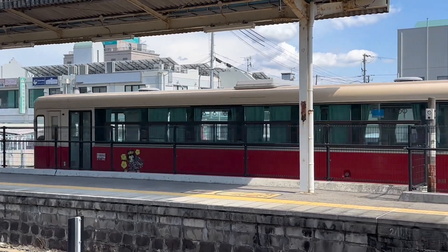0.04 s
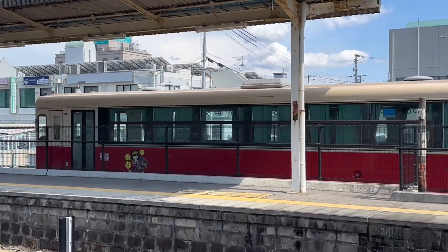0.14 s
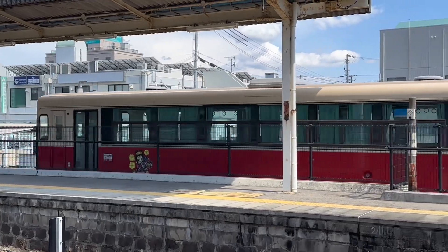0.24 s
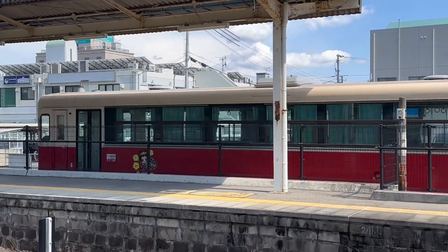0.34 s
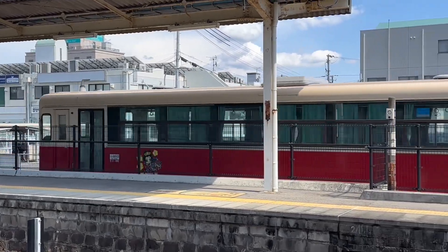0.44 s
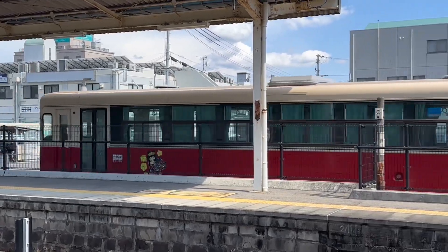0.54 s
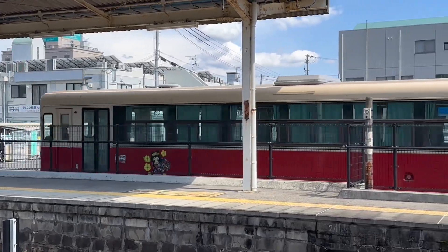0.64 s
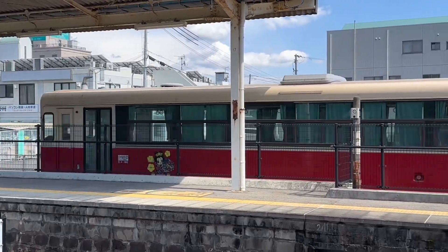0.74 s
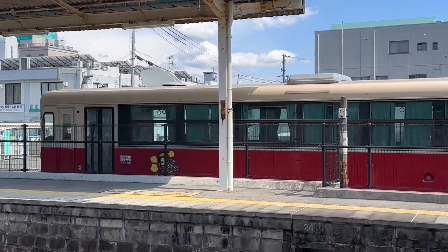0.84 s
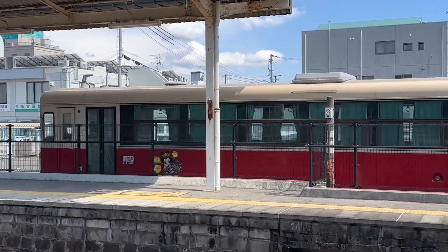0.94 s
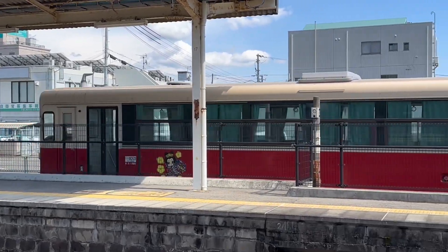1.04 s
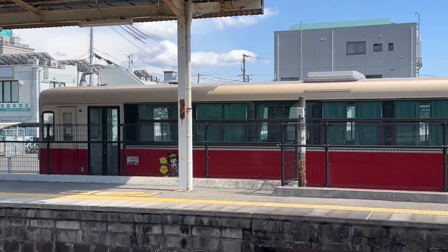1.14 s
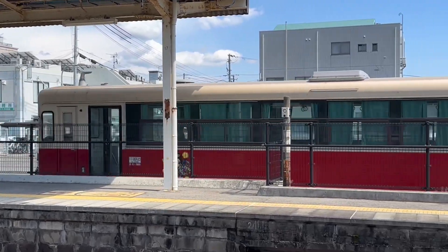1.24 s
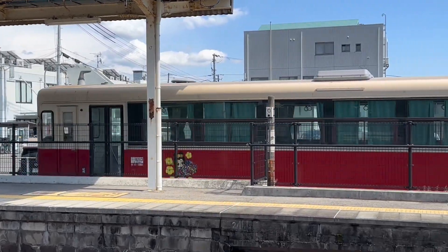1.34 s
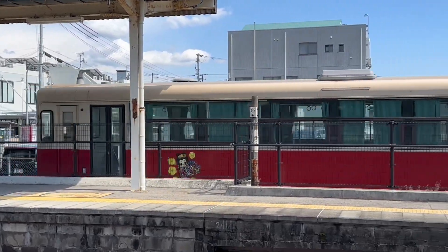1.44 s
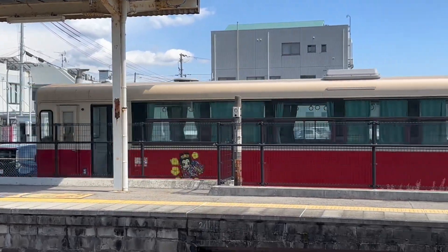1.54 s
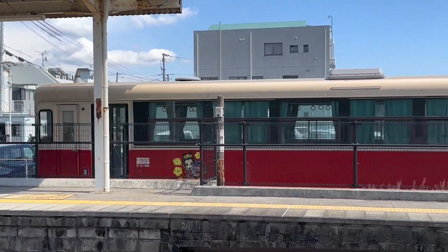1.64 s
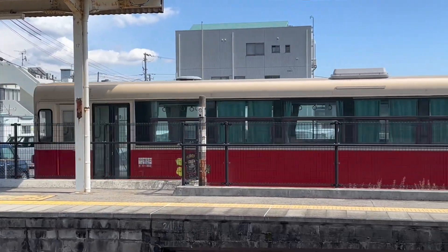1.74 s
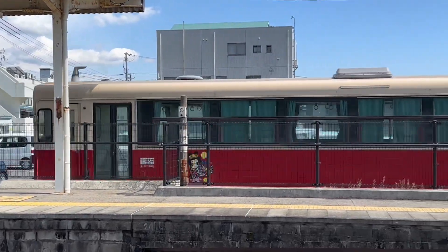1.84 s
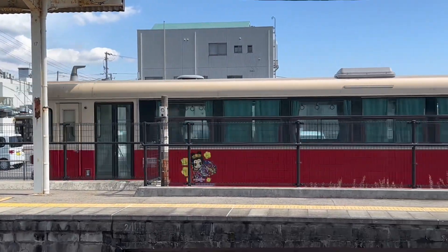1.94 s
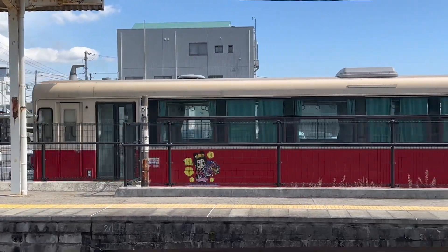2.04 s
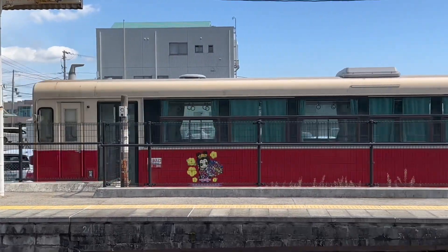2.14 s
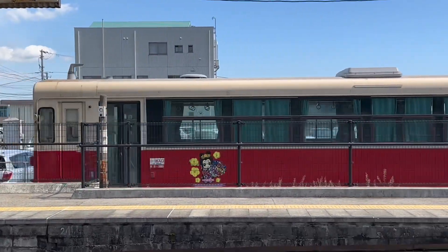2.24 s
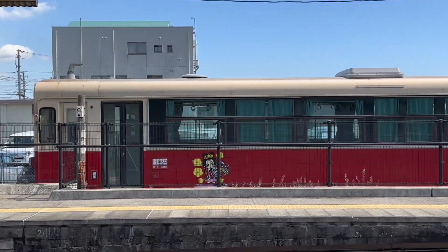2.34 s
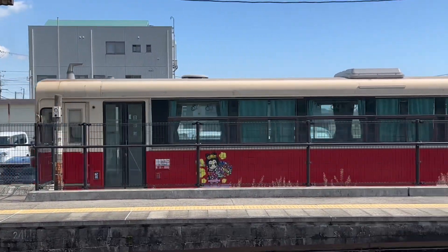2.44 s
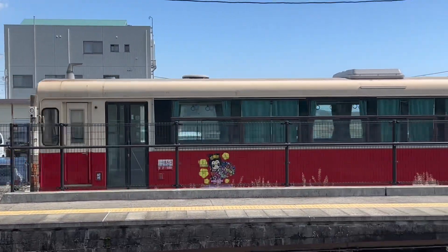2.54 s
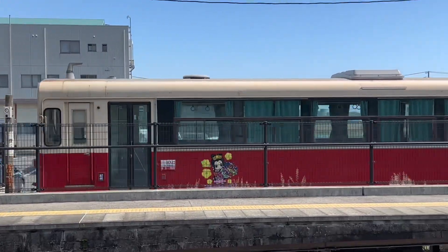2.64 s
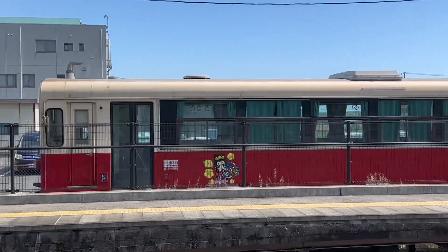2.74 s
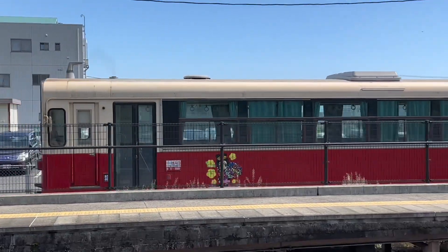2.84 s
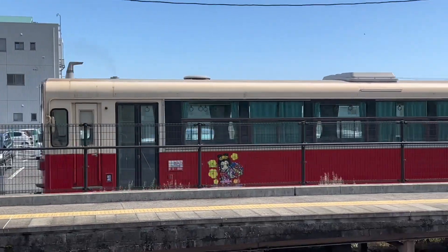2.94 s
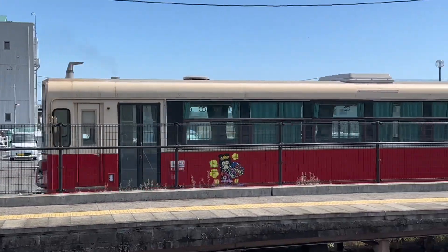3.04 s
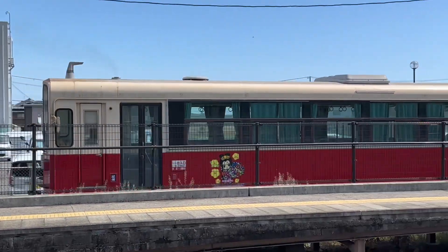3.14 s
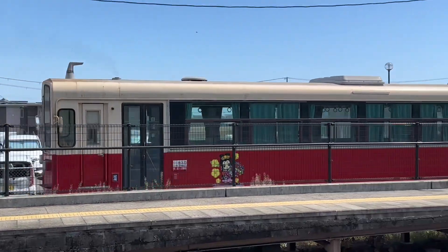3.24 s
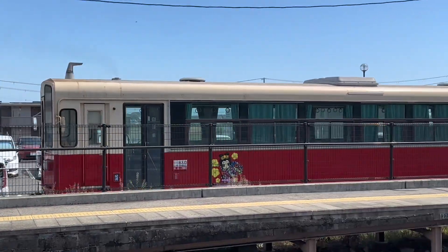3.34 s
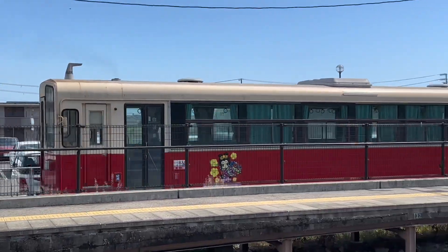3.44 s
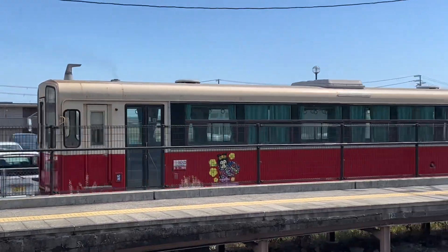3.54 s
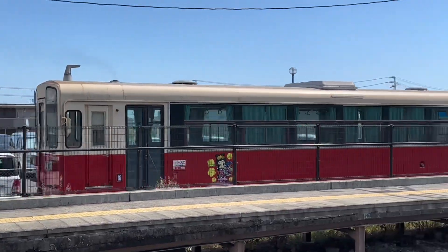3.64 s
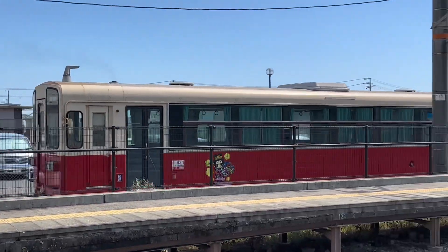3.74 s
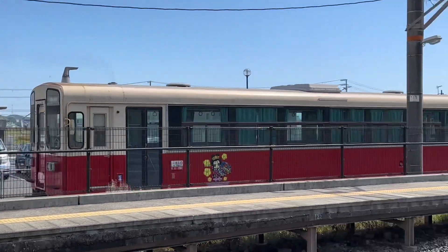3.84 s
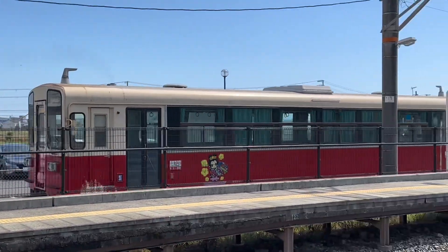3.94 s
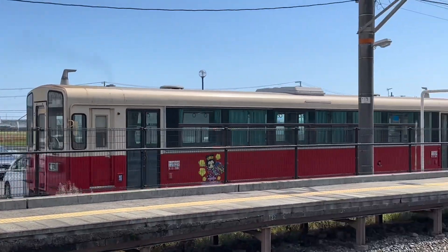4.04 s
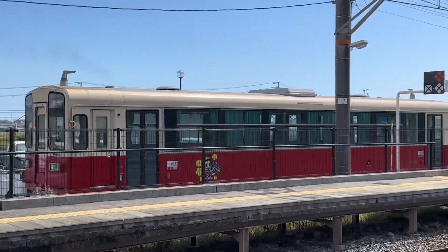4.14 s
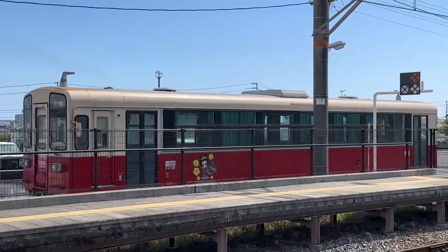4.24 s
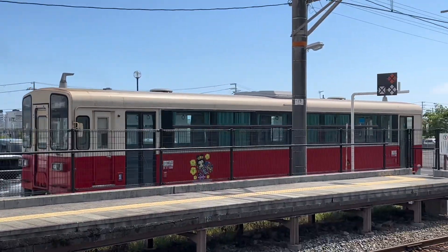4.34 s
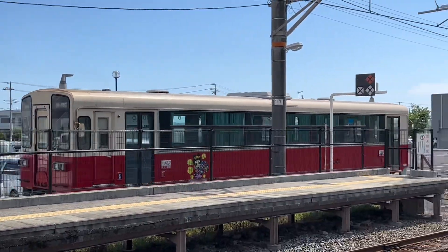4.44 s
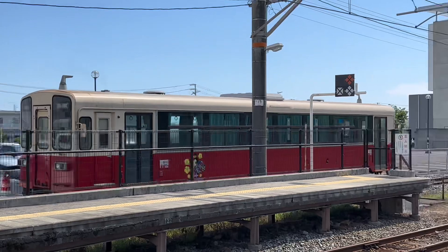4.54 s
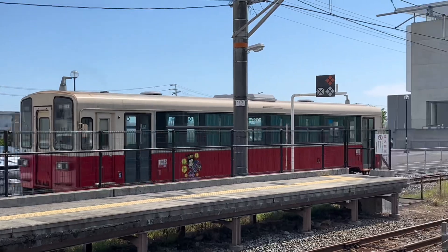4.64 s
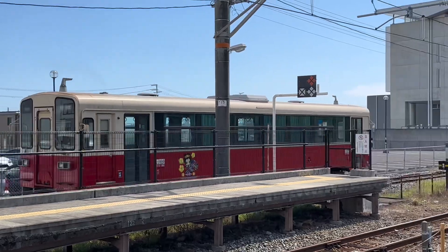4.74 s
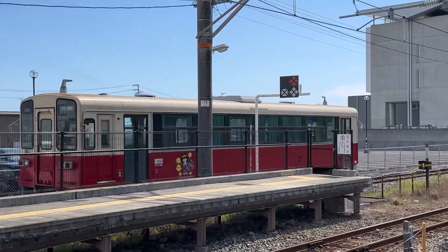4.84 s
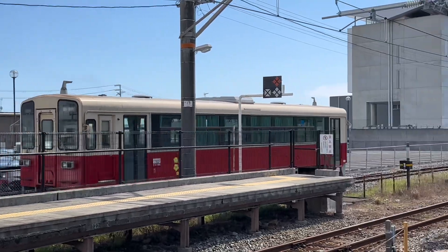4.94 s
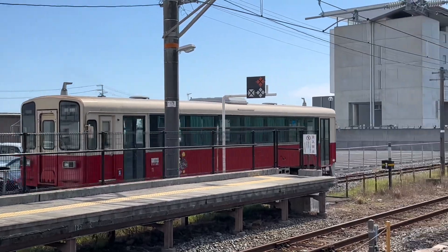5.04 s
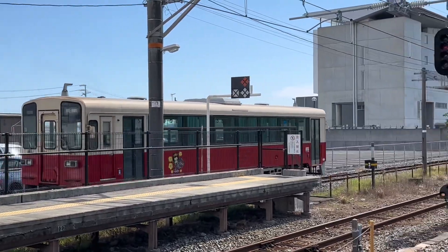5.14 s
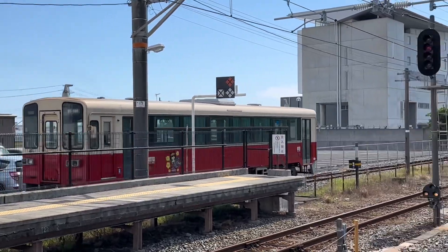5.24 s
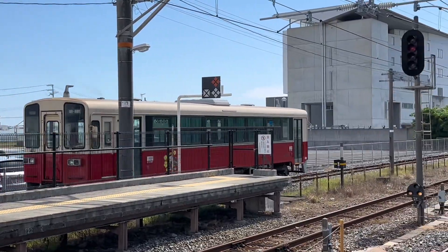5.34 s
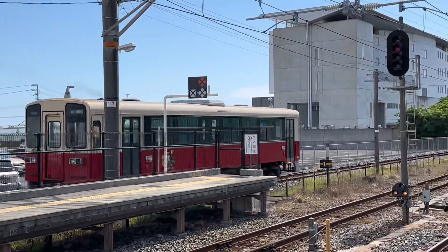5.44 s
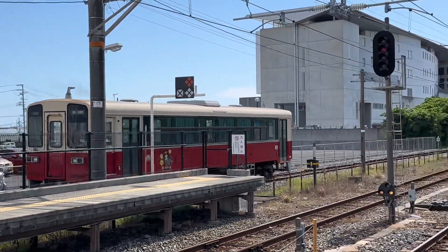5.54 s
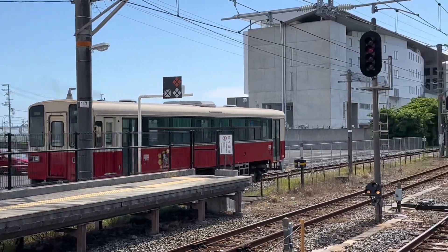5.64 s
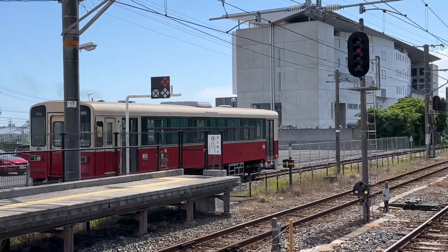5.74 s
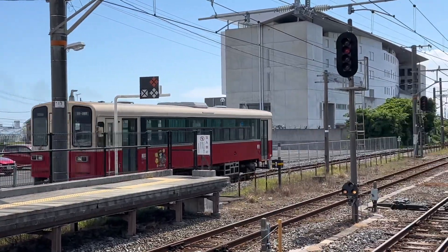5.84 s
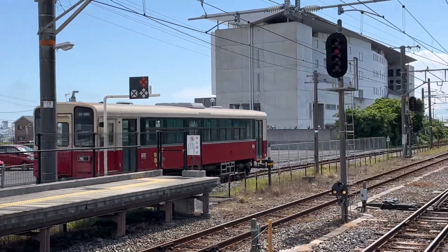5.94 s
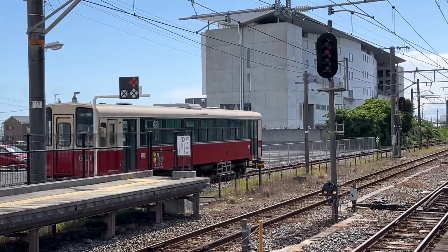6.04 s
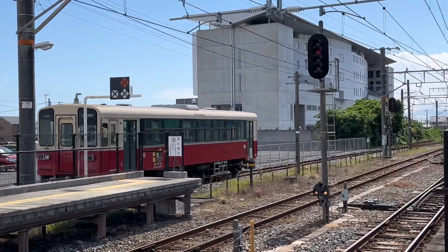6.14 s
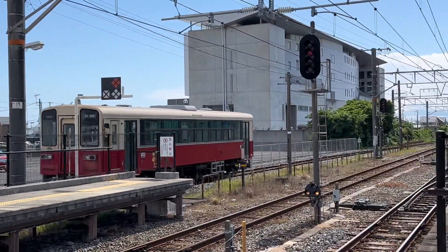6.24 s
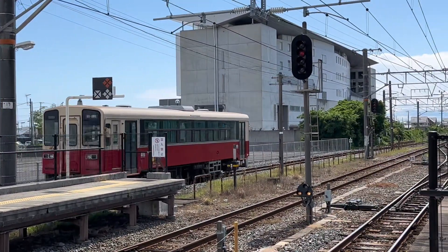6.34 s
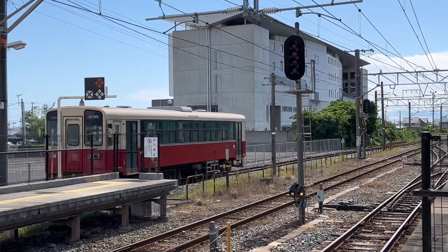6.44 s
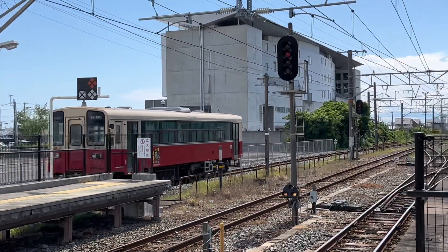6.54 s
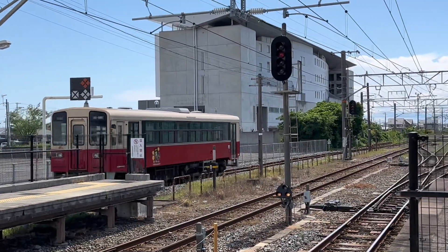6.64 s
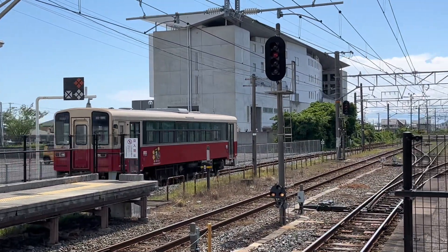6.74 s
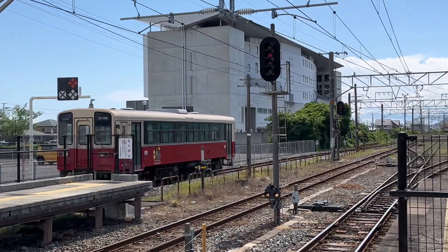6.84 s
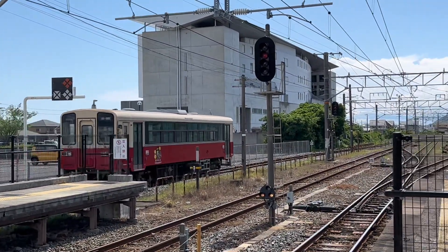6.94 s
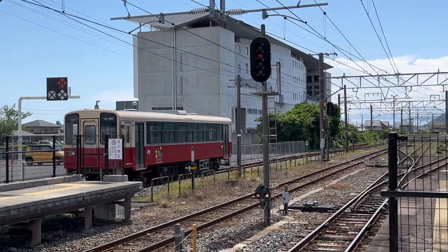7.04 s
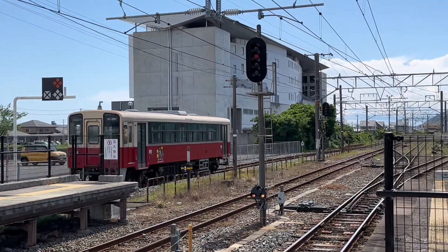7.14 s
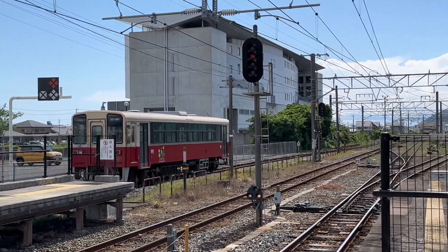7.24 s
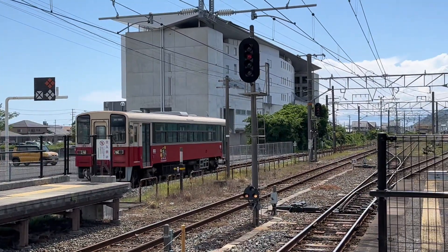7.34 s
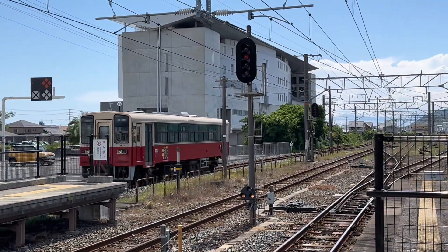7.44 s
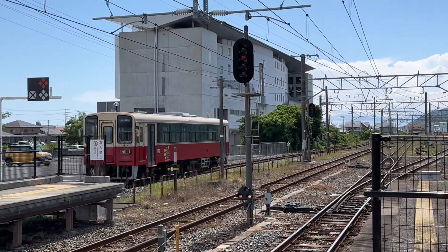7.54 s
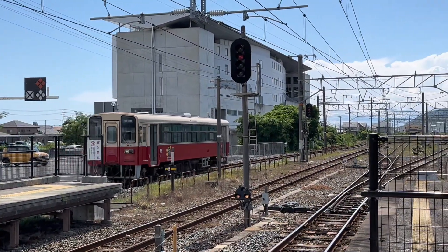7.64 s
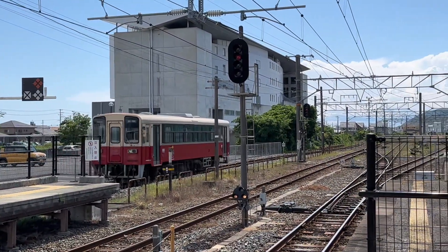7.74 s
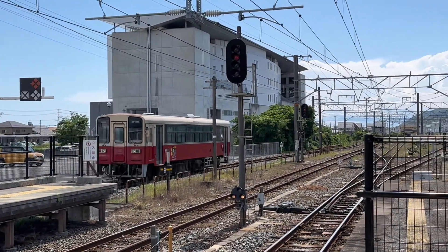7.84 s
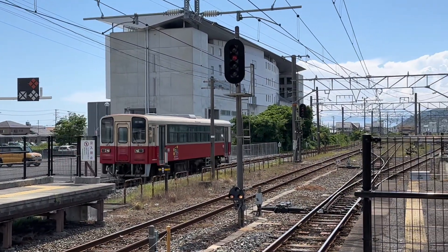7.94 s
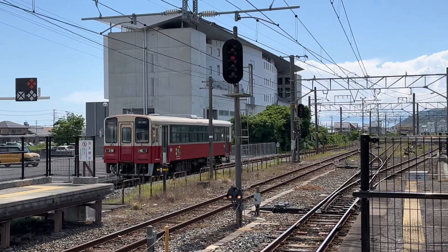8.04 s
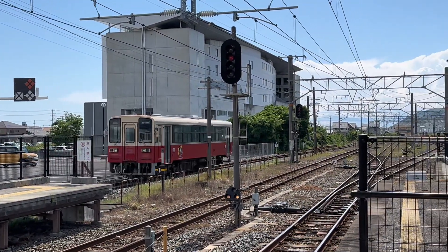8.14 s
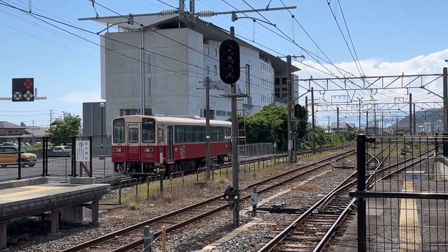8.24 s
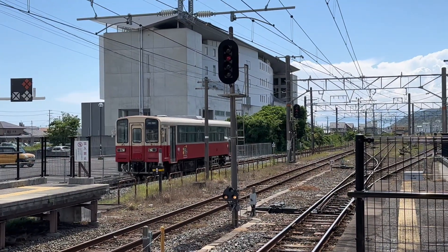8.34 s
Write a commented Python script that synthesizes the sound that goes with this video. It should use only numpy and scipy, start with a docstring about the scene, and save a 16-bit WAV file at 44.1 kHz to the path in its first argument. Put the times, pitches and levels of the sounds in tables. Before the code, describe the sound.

A diesel railcar pulls out past an outdoor station platform. Its engine throbs and clatters, then revs up with a drone and a thin drive whine. The wheels roar and hiss on the rails, clack over joints in pairs and squeal faintly as the car passes close. It then recedes, with a few hollow knocks and softer clicks. Gusty wind rumbles, flutters and thumps on the microphone throughout.

```python
"""A diesel railcar pulls out past a station platform and recedes in a gusty breeze.
Its firings throb in the exhaust and clatter in the casing while the drive train whines. Rough treads
roar on the rails, wheels strike the joints axle by axle and flanges squeal; a few hollow knocks sound
as the car turns away. Wind rumbles, flutters and thumps on the microphone's two ports throughout."""
import sys
import numpy as np
from scipy import signal
from scipy.fft import rfft, irfft
from scipy.io import wavfile
from scipy.ndimage import uniform_filter1d, map_coordinates

SR = 44100
rng = np.random.default_rng(int(sys.argv[2]) if len(sys.argv) > 2 else 0)


def to_wav(s):
    """Save 16-bit WAV."""
    ch = np.atleast_2d(s).T  # columns
    pcm = np.round(np.clip(ch, -1, 1) * 32767)  # PCM
    wavfile.write(sys.argv[1], SR, pcm.astype(np.int16))


N = 369999
TIME = np.arange(N) / SR
FREQS = np.fft.rfftfreq(N, 1 / SR)

# The car draws level at ABREAST_S, TRACK_M away and doing SPEED_M_S, and keeps gathering speed.
ABREAST_S, TRACK_M, SPEED_M_S, ACCEL_M_S2 = 2.58, 12.73, 4.66, 0.58
# The throttle opens; later the car turns its tail to the platform and its body hides the underfloor.
THROTTLE_S, TURN_S, TURN_TAKES_S = 1.46, 5.395, 0.7


def undb(db):
    """Decibels to gain."""
    return 10 ** (np.asarray(db) / 20)


def unit(x):
    """Scale to rms 1."""
    return x / np.sqrt(np.mean(x ** 2))


def curve(points, at=TIME):
    """Join breakpoints with straight lines."""
    return np.interp(at, *np.transpose(points))


def ramp(middle_s, takes_s):
    """A smooth fade from 0 to 1."""
    return .5 + .5 * np.tanh((TIME - middle_s) / takes_s)


def noise(side_db):
    """Stereo white noise: a shared part and a weaker opposed one."""
    mid, side = rng.standard_normal((2, N))
    return unit(mid + undb(side_db) * side * np.array([[1], [-1]]))


def walk(rate, size=N):
    """Smooth random drift of rms 1, about rate turns a second."""
    hold = max(int(SR / rate), 20)
    steps = np.repeat(rng.standard_normal(N // 20 + 1)[:size // hold + 1], hold)
    return unit(uniform_filter1d(uniform_filter1d(steps, hold), hold)[:size])


def colour(x, spectrum):
    """EQ by a (Hz, dB) curve that rolls off beyond its ends; rms 1."""
    hz, db = np.transpose(spectrum)
    gain = undb(np.interp(np.log(FREQS + 1), np.log(hz), db))
    roll_off = np.hypot(1, (hz[0] / 2 / (FREQS + 1)) ** 2) * np.hypot(1, (FREQS / hz[-1] / 2) ** 2)
    return unit(irfft(rfft(x) * gain / roll_off, N))


def resonate(x, modes):
    """Ring (Hz, width, dB) resonances with x; rms 1."""
    body = sum(undb(db) / (1 + 2j * (FREQS - hz) / width) * FREQS / (FREQS + hz)
               for hz, width, db in modes)
    return unit(irfft(rfft(x) * body, N))


def tones(table, peak_at=0.48):
    """Wavering tones that glide, swelling until the share peak_at of their length and then fading."""
    out = np.zeros(N)
    for start, length, start_hz, end_hz, width_hz, db in table:
        near = (TIME >= start) & (TIME < start + length)
        progress = (TIME[near] - start) / length
        phase = 2 * np.pi * np.cumsum(start_hz + (end_hz - start_hz) * progress) / SR
        tone = walk(width_hz, len(phase)) * np.cos(phase) + walk(width_hz, len(phase)) * np.sin(phase)
        swell = np.sin(np.pi * np.interp(progress, [0, peak_at, 1], [0, .5, 1]))
        out[near] += undb(db) * swell * tone
    return out


def distance_m():
    """How far away the car is as it draws level and runs on."""
    age = TIME - ABREAST_S
    return np.hypot(SPEED_M_S * age + .5 * ACCEL_M_S2 * age ** 2, TRACK_M)


def passing(db, idle_db, hidden_db, build_s, lag_s=0, hide_lag_s=0):
    """Fader ride in dB: follows distance, adds idle_db before the throttle, hidden_db after the turn."""
    distance_db = -20 * np.log10(distance_m() / TRACK_M)
    load = ramp(THROTTLE_S + lag_s, build_s)
    hidden = ramp(TURN_S + hide_lag_s, TURN_TAKES_S)
    return db + distance_db + idle_db * (1 - load) + hidden_db * hidden


# The revs climbing. Each row: time in seconds, firing rate in Hz.
FIRING_RATE = [(0, 63.2), (.6, 64.04), (1.2, 66.94), (1.6, 69.53), (2.0, 72.4), (2.3, 73.4), (2.55, 74.4),
               (2.75, 76.9), (3.1, 77.9), (3.6, 78.7), (4.6, 79.3), (8.39, 80)]
# The drone's harmonics. Each row: multiple of the firing rate, relative level in dB.
DRONE_ORDERS = [(7, -6), (10, 1), (10.5, -3), (11, -5), (11.5, -6), (12, 3), (13, 1), (13.5, -3), (14, -6),
                (15, -3), (16, -6), (21, -9), (22, -9)]
# The ring of casing and underfloor. Each row: pitch in Hz, width in Hz, relative level in dB.
CASING_MODES = [(767, 23, -8), (1052, 77, 3), (1480, 50, 0), (3180, 88, -15)]


def engine(knock_depth=0.52, overtone_db=-8, waver_db=3):
    """Each firing pushes the exhaust and knocks the casing; under load the high orders drone."""
    firings = np.cumsum(curve(FIRING_RATE) * (1 + .003 * walk(20))) / SR
    exhaust = sum(undb(overtone_db * k) * np.sin(2 * np.pi * (k + 1) * firings) for k in range(4))
    drone = np.zeros(N)
    for order, db in DRONE_ORDERS:
        swell = undb(db + waver_db * walk(9.4))  # moving air swells and fades each order on its own
        drone += swell * np.sin(2 * np.pi * (order * firings + rng.random()) + 0.27 * walk(12))
    pulse = 1 + knock_depth * np.cos(2 * np.pi * firings)
    clatter = resonate(noise(side_db=-47) * pulse * undb(0.62 * walk(70)), CASING_MODES)
    exhaust_db = passing(db=-38, idle_db=3.5, hidden_db=-18, build_s=0.27) + 6 * walk(9.7)
    clatter_db = passing(db=-37, idle_db=0, hidden_db=-52, build_s=0.33)
    drone_db = passing(db=-35.5, idle_db=-11, hidden_db=-31, build_s=0.12, lag_s=0.44)
    return unit(exhaust) * undb(exhaust_db) + clatter * undb(clatter_db) + unit(drone) * undb(drone_db)


# Thin midrange whines. Each row: start and length in seconds, start pitch, end pitch and width in Hz,
# level in dB.
DRIVE_WHINES = [(-0.2, 1, 810, 790, 22.5, -42), (0.1, 0.86, 1051, 1057, 7.7, -38.5),
                (0.1, 0.55, 1520, 1518, 38, -43), (0.6, 0.7, 1485, 1505, 24, -46),
                (0.8, 0.82, 1035, 1068, 20, -46), (1.2, 0.96, 960, 963, 20, -38),
                (1.45, 0.77, 1025, 1055, 7.1, -37), (1.7, 0.596, 1075, 1098, 7, -37.5),
                (1.3, 0.5, 1480, 1500, 9, -41.5), (1.95, 0.42, 1534, 1523, 8.3, -41),
                (2.0, 1.01, 871, 894, 6.8, -36.5), (2.35, 0.92, 1001, 1018, 18, -38),
                (2.5, 0.51, 916, 930, 6, -38), (2.55, 0.62, 764, 786, 9.7, -37),
                (2.5, 0.835, 1146, 1178, 8.2, -44), (3.15, 0.5, 1165, 1206, 7.6, -42.5),
                (3.25, 0.71, 934, 948, 7.6, -45), (3.35, 0.92, 1052, 1059, 7, -42),
                (3.55, 0.91, 1037, 1019, 12.3, -36.5), (2.65, 0.5, 1486, 1494, 10, -46),
                (3.25, 0.56, 1464, 1470, 10.2, -43.5), (3.9, 0.47, 1514, 1543, 12, -43.5)]


def drive_train():
    """The drive train whines in narrow, overlapping tones, most of them creeping upward."""
    return tones(DRIVE_WHINES)


def ridged(x, ripple_db, spacing_hz):
    """Fine random spectral ridges give noise a faint metallic ring, sinking as the car passes; rms 1."""
    ridges = np.interp(FREQS / spacing_hz, np.arange(2400), rng.standard_normal(2400))
    ringing = irfft(rfft(x) * undb(ripple_db * ridges), N)
    sent = (TIME - distance_m() / 343) * SR  # the changing travel time gives the Doppler bend
    return unit(np.array([map_coordinates(side, [sent], order=3, mode="mirror") for side in ringing]))


# The rolling bed's low, middle and top layers. Each row: frequency in Hz, relative level in dB.
ROAR_EQ = [(60, -22), (200, 1.5), (400, -1), (510, -2.5), (660, -6), (780, 2.5), (960, 1), (1150, -2.5),
           (1350, -7), (1700, -7.5), (2200, -38), (3000, -27.5), (5000, -66)]
HISS_EQ = [(1000, 3), (1500, 3), (2050, 1), (2700, -4.5), (3350, -5), (3900, -11.5), (5000, -18),
           (7000, -45)]
SIZZLE_EQ = [(3000, -3), (4400, 2), (6000, -0.5), (7000, 1), (9000, -0.5), (10400, 0.5), (12200, -9),
             (15500, -9.5)]
# The rails' high shimmer. Each row: pitch in Hz, width in Hz, relative level in dB.
RAIL_MODES = [(3510, 320, 8.5), (5300, 290, 0.5), (6400, 200, -3)]


def rolling(waver_db=2.5):
    """Rough treads make wheels and rails roar, hiss, sizzle and ring, harder under power."""
    roar_db = passing(db=-31.5, idle_db=-4.5, hidden_db=-13.5, build_s=0.095,
                      lag_s=0.64, hide_lag_s=-0.042)
    hiss_db = passing(db=-33.5, idle_db=-3.5, hidden_db=-7, build_s=0.18)
    sizzle_db = passing(db=-40.5, idle_db=-4.5, hidden_db=-12, build_s=0.052, hide_lag_s=0.15)
    # the rails carry their ringing back, so it fades more slowly than the sizzle
    ring_db = passing(db=-49, idle_db=-1, hidden_db=0, build_s=.1)
    roar = colour(noise(side_db=-34), ROAR_EQ) * undb(roar_db + walk(24.93))
    hiss = ridged(colour(noise(side_db=-57), HISS_EQ), ripple_db=1, spacing_hz=34.9)
    hiss *= undb(hiss_db + 0.97 * walk(60))
    sizzle = ridged(colour(noise(side_db=-66), SIZZLE_EQ), ripple_db=1.9, spacing_hz=44.9)
    sizzle *= undb(sizzle_db + 1.1 * walk(40))
    ring = sum(resonate(rng.standard_normal(N), [(hz, width, 0)]) * undb(db + waver_db * walk(4))
               for hz, width, db in RAIL_MODES)
    return roar + hiss + sizzle + unit(ring) * undb(ring_db)


# The bed of breeze. Each row: time in seconds, level in dB.
BREEZE_LEVEL = [(0, -32), (1.6, -34.5), (2.3, -31), (3.3, -33.5), (3.8, -27.5), (4.3, -29), (5.3, -31),
                (5.7, -35.5), (6.6, -35), (6.9, -38.5), (8.39, -40.5)]
# Gusts on top. Each row: start and length in seconds, rumble level and flutter level in dB.
WIND_GUSTS = [(-0.02, 0.072, -29.5, -39), (0.163, 0.099, -26, -41), (0.405, 0.13, -27, -37),
              (0.597, 0.045, -29, -33), (0.733, 0.071, -24.5, -34.5), (0.878, 0.04, -25.5, -49),
              (1.04, 0.12, -26, -49), (1.23, 0.047, -31, -40), (1.427, 0.12, -30, -37.5),
              (1.736, 0.14, -23, -39), (1.942, 0.28, -27, -34), (2.296, 0.21, -26.5, -30),
              (2.59, 0.11, -26.5, -42), (2.87, 0.067, -31, -26.5), (3.037, 0.15, -25.5, -34),
              (3.357, 0.3, -29, -37), (3.72, 0.31, -35, -28.5), (4.341, 0.26, -21.5, -24),
              (4.65, 0.15, -26.5, -28), (4.9, 0.28, -24, -40), (5.24, 0.1, -31, -45),
              (5.78, 0.18, -26, -35), (5.988, 0.16, -24.5, -25.5), (6.298, 0.1, -29.5, -37),
              (6.473, 0.033, -30.5, -42), (6.612, 0.059, -36, -45), (6.94, 0.082, -36.5, -44),
              (7.256, 0.064, -31, -39), (7.42, 0.15, -31, -34.5), (7.59, 0.22, -32.5, -35),
              (7.815, 0.067, -23, -33), (7.978, 0.11, -35, -47), (8.348, .1, -24, -35)]


def gusts(rise_s=0.018, fall_s=0.058, breeze_flutter_db=-4, unrest_db=0.5):
    """Envelopes for rumble and flutter: each gust rises, holds and falls over a restless breeze."""
    breeze_db = curve(BREEZE_LEVEL)
    rumble_power, flutter_power = undb(breeze_db) ** 2, undb(breeze_db + breeze_flutter_db) ** 2
    for start, length, rumble_db, flutter_db in WIND_GUSTS:
        age = TIME - start
        blow = np.clip(age / rise_s, 0, 1) * np.exp(-np.maximum(age - length, 0) / fall_s)
        rumble_power += (undb(rumble_db) * blow) ** 2
        flutter_power += (undb(flutter_db) * blow) ** 2
    return np.sqrt([rumble_power, flutter_power]) * undb(unrest_db * walk(21))


def even(x, window_s):
    """Level out a stereo noise's slow swells, so that its envelope alone shapes it."""
    power = uniform_filter1d(np.mean(x ** 2, axis=0), int(window_s * SR))
    return x / np.sqrt(power + 1e-9)


def swing(age, hz, rise_cycles, sag, half_turns):
    """A short pressure swing that sags in pitch as it fades; half_turns is its starting phase."""
    progress = age * hz / rise_cycles
    phase = 2 * np.pi * rise_cycles * np.log1p(sag * progress) / sag + np.pi * half_turns
    return progress * np.exp(1 - progress) * np.sin(phase)


def eddies(each_per_s=13, lean_db=2.2):
    """A random patter of small pressure swings in five sizes, each leaning to one port."""
    out, age = np.zeros((2, N)), TIME[:SR // 10]
    for hz, db in [(160, -2), (220, 0), (290, 0.5), (380, -1.5), (520, -4.5)]:
        arrives = rng.random(N) < each_per_s / SR
        pan = undb(np.array([[lean_db], [-lean_db]]) * rng.uniform(-1.7, 1.7, N))
        kicks = arrives * rng.choice([-1, 1], N) * pan
        shape = swing(age, hz, rise_cycles=0.53, sag=0.14, half_turns=rng.random())
        out += undb(db) * unit(signal.fftconvolve(kicks, shape[None], axes=1)[:, :N])
    return unit(out)


# The wind's deep end and its flapping low mids. Each row: frequency in Hz, relative level in dB.
RUMBLE_EQ = [(20, -25), (32, -29), (48, -2.5), (65, 1.5), (90, -1.5), (140, -9), (220, -13.5), (500, -63)]
FLUTTER_EQ = [(70, -38), (160, -6.5), (290, 0.5), (450, -6), (650, -7.5), (1100, -40), (3000, -75)]


def wind(rumble_db=-1, flutter_db=-6, eddy_db=-3, churn_db=2, tatter_db=4):
    """Large eddies rumble on the ports; small ones patter over a ragged flutter."""
    rumble_swell, flutter_swell = gusts()
    rumble = even(colour(noise(side_db=-10), RUMBLE_EQ), window_s=0.057)
    rumble *= undb(rumble_db + churn_db * walk(35))
    flutter = colour(noise(side_db=-12.5) * undb(tatter_db * walk(70)), FLUTTER_EQ) * undb(flutter_db)
    return rumble * rumble_swell + (flutter + eddies() * undb(eddy_db)) * flutter_swell


# A dull thud, for wind thumps and bogies alike. Each row: frequency in Hz, relative level in dB.
THUD_EQ = [(40, -3), (90, -13), (300, 2.5), (600, -4.5), (1000, -28.5), (1800, -37), (4000, -75)]
# Wind hits, and at 7.717 s the thud of a wheel landing hard past a joint. Each row: start in seconds, body
# level in dB, body pitch in Hz, snap level in dB.
WIND_THUMPS = [(0.018, -17, 157, -26), (0.034, -19, 150, -20), (0.198, -24, 168, -16.5),
               (0.24, -21, 149, -26.5), (0.307, -23, 168, -23), (0.402, -18, 159, -19),
               (0.462, -18.5, 150, -24), (0.495, -26, 300, -19.5), (0.517, -25, 171, -16.5),
               (0.624, -18.5, 170, -23), (0.759, -12, 240, -25), (0.768, -22, 180, -14),
               (0.802, -14, 161, -21), (0.821, -17.5, 170, -19), (0.925, -17, 170.3, -25),
               (1.030, -22, 170, -26), (1.132, -17, 147, -13.5), (1.173, -25, 190, -31),
               (1.230, -16.5, 130, -42), (1.304, -18, 164, -22), (1.402, -24, 199, -20.5),
               (1.467, -25, 169, -23), (1.499, -14.5, 159, -24), (1.572, -17, 304, -15),
               (1.615, -19.5, 232, -25), (1.749, -15.5, 150, -31), (1.842, -12, 167, -36),
               (1.975, -15.5, 170, -33), (2.428, -23, 170, -33), (2.879, -18, 160, -20),
               (2.911, -21, 182, -36), (3.082, -21, 160, -25), (3.158, -17, 160, -18.5),
               (3.194, -19, 150, -17), (3.776, -17, 234, -35), (3.833, -20, 283, -18),
               (3.97, -21, 288, -25), (4.023, -16, 162, -12.5), (4.379, -15, 181.8, -27),
               (4.411, -16, 182, -16), (4.528, -11, 204, -12), (4.665, -14, 217, -34),
               (4.695, -20, 189, -32), (4.763, -15.5, 164, -25), (4.965, -35, 145, -13.5),
               (5.158, -20, 166, -16), (5.179, -22, 180, -18), (5.249, -21.5, 151, -32),
               (5.363, -21, 168, -37), (5.631, -33, 200, -25), (5.841, -18, 131, -32), (6.2, -19, 199, -29),
               (6.23, -15.5, 222, -29), (6.270, -19.5, 187, -30), (6.34, -21, 240, -41),
               (6.414, -24, 170, -46), (6.485, -23, 272, -50), (6.624, -27, 200, -30),
               (6.675, -32, 199, -41), (6.943, -24, 160, -38), (7.279, -20.5, 118, -37),
               (7.426, -20, 150, -23), (7.482, -19.5, 154, -42), (7.717, -16.5, 238, -34),
               (7.759, -18, 199, -38), (7.801, -26, 160, -22), (7.840, -14.5, 194, -20),
               (7.878, -42, 170, -31), (7.905, -32, 178, -37), (7.927, -36, 253, -21.5),
               (7.988, -27, 191, -42), (8.08, -25.5, 150, -22)]


def wind_thumps(snap_hz=680, roughness=0.26):
    """A strong eddy hits the ports: a quick snap at its edge, then a slower swing."""
    out = np.zeros((2, N))
    grit = 1 + roughness * colour(noise(side_db=-2.5), THUD_EQ)
    for start, body_db, body_hz, snap_db in WIND_THUMPS:
        body_phase, snap_phase, lean, detune = rng.uniform(-0.9, 1, 4)
        near = (TIME >= start) & (TIME < start + .1)
        age = TIME[near] - start
        body = swing(age, body_hz, rise_cycles=0.49, sag=0.082, half_turns=body_phase)
        snap = swing(age, snap_hz * (1 + 0.15 * detune), rise_cycles=1, sag=0.52, half_turns=snap_phase)
        pan = undb(np.array([[1.5], [-1.5]]) * lean)
        out[:, near] += (undb(body_db) * body + undb(snap_db) * snap) * pan
    return out * grit


def burst(age, rise, length, shape=2.3):
    """Envelope with a quick attack, brief hold and decay; a higher shape holds longer and ends sooner."""
    age = np.maximum(age, 0)
    return (1 - np.exp(-age / rise)) * np.exp(-(age / length) ** shape)


# The clang of wheel and bogie. Each row: pitch in Hz, width in Hz, relative level in dB.
WHEEL_MODES = [(500, 43, 10), (845, 55, 4.5), (1010, 690, 23), (1450, 87, 8), (2360, 170, 4.5),
               (2600, 140, 9), (3060, 250, 7), (3300, 140, 8.5), (3520, 81, -6), (4030, 130, 7),
               (6470, 140, -11)]


def wheel_ring():
    """Each wheel is struck at its own spot, so its modes differ a little in pitch and strength."""
    age = TIME[:SR // 10]
    detunes, accents_db = rng.standard_normal((2, len(WHEEL_MODES))) * [[.015], [2]]
    ring = np.zeros(len(age))
    for (hz, width, db), detune, accent_db in zip(WHEEL_MODES, detunes, accents_db):
        decay = undb(db + accent_db) * width * np.exp(-np.pi * width * age)
        ring += decay * np.sin(2 * np.pi * hz * (1 + detune) * age)
    return ring / np.linalg.norm(ring)


# The bite of steel on steel. Each row: frequency in Hz, relative level in dB.
CLASH_EQ = [(300, 13), (600, -3), (900, -11), (1500, 5), (2300, 1), (2800, 3.5), (3250, 2.5), (4400, -7),
            (7000, -4.5), (10000, -9), (15500, -31)]
# The clickety-clack. Each row: strike time in seconds, clash level and thud level in dB,
# length and landing delay in seconds.
JOINT_HITS = [(0.316, -31.5, -29.5, 0.055, 0.0125), (0.706, -32.5, -32, 0.088, 0.028),
              (2.376, -23.5, -32, 0.05, 0.02), (2.718, -25, -27.5, 0.075, 0.016),
              (4.173, -28, -28, 0.089, 0.028), (4.468, -26, -22.5, 0.067, 0.017),
              (5.801, -38, -27, 0.074, 0.016), (6.095, -38.5, -48, 0.074, 0.021),
              (7.314, -40.5, -33.5, 0.062, 0.0192), (7.414, -36.5, -40, 0.047, 0.02),
              (7.605, -38.5, -43, 0.045, 0.012), (7.698, -36, -35, 0.028, 0.0076),
              (8.128, -56, -47, 0.11, 0.016)]


def rail_joints(rise_s=0.0079, lead_s=0.011, strike_s=0.0018, strike_db=-3, land_db=-1,
                ring_db=1.5, crash_db=-3, rattle_db=2, echo_db=-18, echo_s=0.22, far_hz=8000):
    """A wheel hits the gap and lands on the next rail: it rings, steel clashes, the bogie thuds."""
    clash_level, thud_level, ring = np.zeros((3, N))
    grit = rng.standard_normal(N)
    for start, clash_db, thud_db, length, land_s in JOINT_HITS:
        near = (TIME > start - .05) & (TIME < start + .7)
        age = TIME[near] - start
        strike = undb(strike_db) * burst(age, strike_s / 10, strike_s)
        landing = undb(land_db) * burst(age - land_s, strike_s / 10, strike_s)
        station_echo = undb(echo_db) * burst(age, length, echo_s)
        blow = burst(age + lead_s, rise_s, length, shape=1.7) + strike + landing + station_echo
        clash_level[near] += undb(clash_db) * blow
        thud_level[near] += undb(thud_db) * blow
        ring[near] += undb(clash_db) * signal.fftconvolve(blow * grit[near], wheel_ring())[:len(age)]
    clash = clash_level * ridged(colour(noise(side_db=-61), CLASH_EQ), ripple_db=4.5, spacing_hz=58.34)
    steel = undb(ring_db) * ring + undb(crash_db) * clash
    far = ramp(TURN_S, TURN_TAKES_S)  # far blows lose their top
    dull = signal.sosfiltfilt(signal.butter(2, far_hz, fs=SR, output="sos"), steel)
    thud = thud_level * colour(noise(side_db=-36), THUD_EQ)
    return ((1 - far) * steel + far * dull + thud) * undb(rattle_db * walk(150))


# Wheels singing on the rails. Each row: start and length in seconds, start pitch, end pitch and
# width in Hz, level in dB.
FLANGE_SQUEALS = [(1.35, 0.59, 3400, 3350, 428, -49), (1.36, 0.45, 3452, 3420, 40.6, -44),
                  (1.42, 0.16, 3295, 3290, 40, -46), (1.65, 0.7, 3385, 3280, 70, -48),
                  (1.9, 0.83, 3400, 3365, 400, -43), (2.35, 0.96, 3420, 3380, 159.4, -48),
                  (3.05, 0.58, 3425, 3460, 70, -47.5), (3.5, 1.04, 3300, 3280, 179, -54),
                  (4.68, 0.53, 3420, 3405, 80, -50), (5.0, 0.45, 3085, 3130, 45, -49),
                  (5.55, 0.29, 1690, 1620, 120.3, -46.5), (5.852, 0.43, 1565, 1430, 70.5, -51),
                  (6.35, 0.19, 2060, 2040, 196, -52), (7.15, 0.3, 5300, 5320, 181, -66),
                  (7.7, 0.27, 5340, 5370, 160, -64), (7.45, 1.1, 6695, 6720, 34.6, -74),
                  (7.5, 0.85, 3045, 2990, 40, -67), (7.67, 0.092, 14700, 14400, 1600, -59)]


def squeals(patchy_db=2.5, trim_db=-1.5):
    """The flanges catch and slip, so their song comes in broken chirps."""
    return tones(FLANGE_SQUEALS) * undb(patchy_db * walk(60) + trim_db)


# Late, hollow accents. Each row: start and length in seconds, start pitch, end pitch and width in Hz,
# level in dB.
HOLLOW_KNOCKS = [(5.797, 0.098, 942, 864, 804, -36), (6.077, 0.047, 970, 780, 824, -27.5),
                 (6.122, 0.054, 680, 566, 300, -32), (8.123, 0.05, 846, 736, 440, -41)]


def knocks():
    """Short, noisy knocks with a hard attack and a falling pitch."""
    return tones(HOLLOW_KNOCKS, peak_at=0.04)


def scene():
    """The railcar and the wind together."""
    return (engine() + drive_train() + rolling() + wind() + wind_thumps()
            + rail_joints() + squeals() + knocks())


# The stereo smear. Each row: frequency in Hz, phase of the right port against the left in radians.
PORT_PHASE_SHIFT = [(40, .1), (150, .35), (500, .42), (1300, .38), (1800, 0), (2600, 0), (3300, -.22),
                    (4600, 0), (6600, 0), (7400, -1.4), (7750, -3.08), (8600, -3.14), (9200, -1.5),
                    (10300, -.7), (11000, 0), (13000, 0), (14000, 1.2), (15700, 2.5)]


def record(dry, low_cut_hz=30, top_hz=15700):
    """The microphone rounds off peaks, skews its ports' phase and cuts the deepest bass and the top."""
    rounded = np.tanh(dry)
    skew = np.exp(.5j * curve(PORT_PHASE_SHIFT, at=FREQS) * np.array([[-1], [1]]))
    low_cut = 1 / np.hypot(1, (low_cut_hz / (FREQS + 1)) ** 4)
    ports = irfft(rfft(rounded) * low_cut * skew, N)
    return signal.sosfilt(signal.ellip(10, .2, 80, top_hz, fs=SR, output="sos"), ports)


dry = scene()
out = record(dry)
to_wav(out)
```